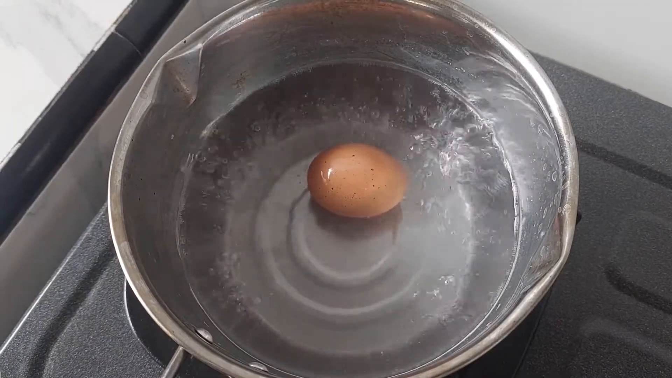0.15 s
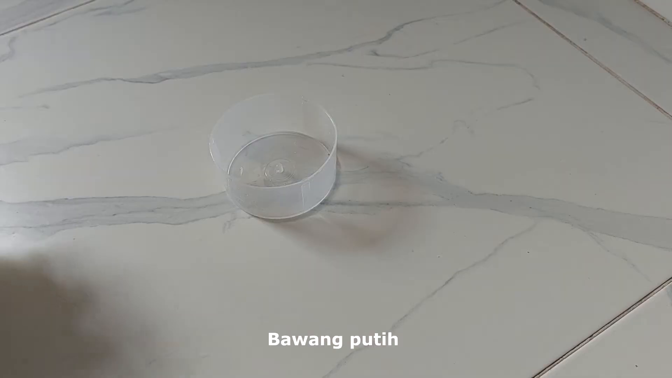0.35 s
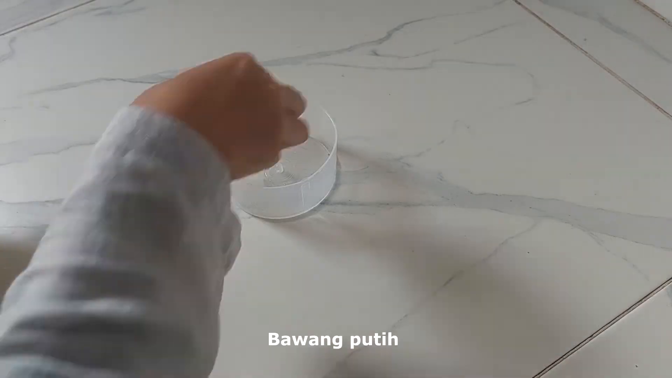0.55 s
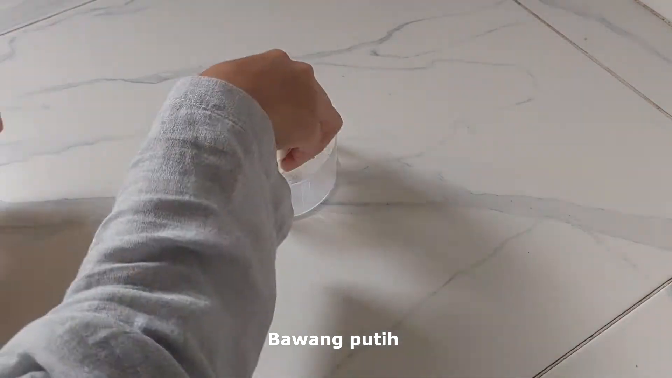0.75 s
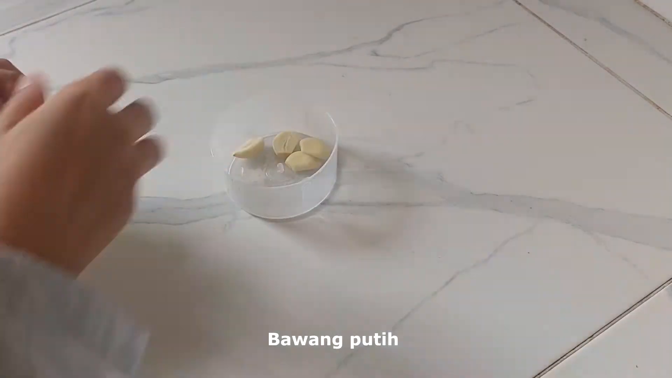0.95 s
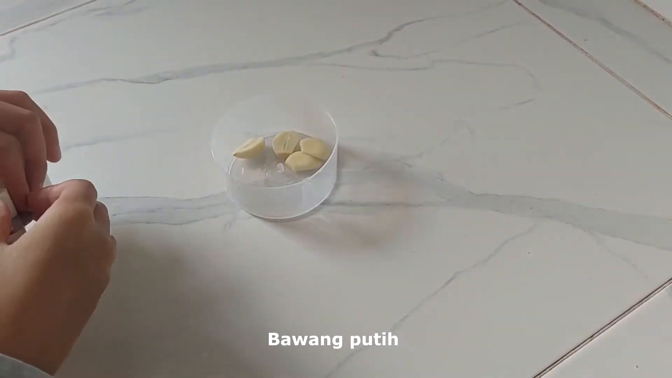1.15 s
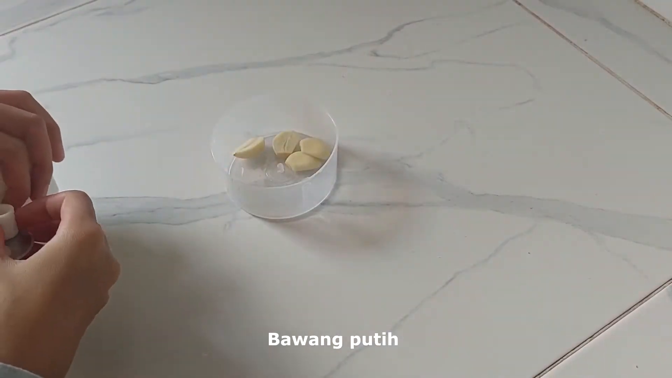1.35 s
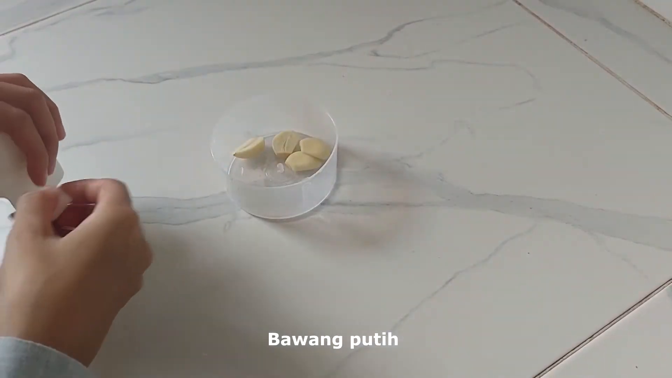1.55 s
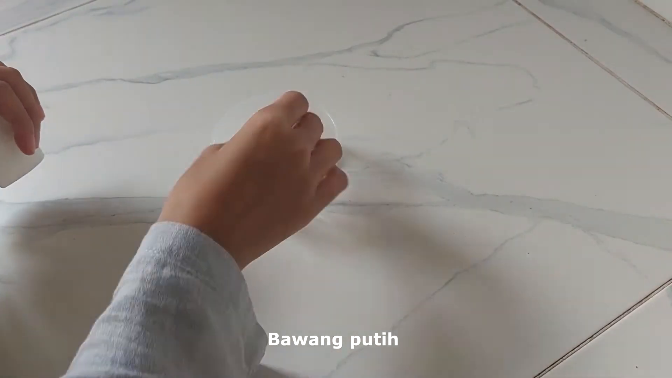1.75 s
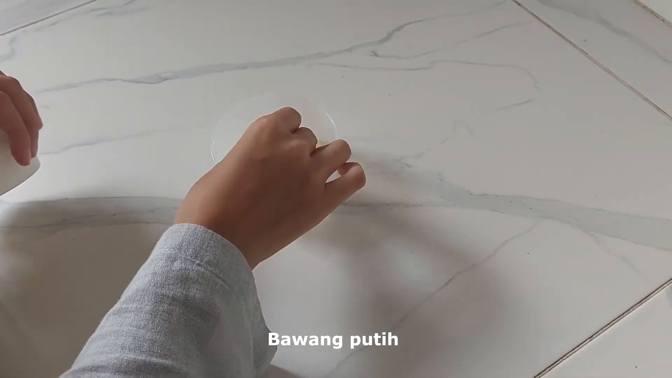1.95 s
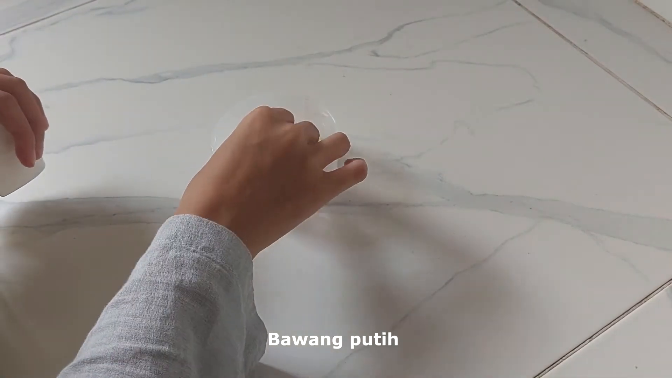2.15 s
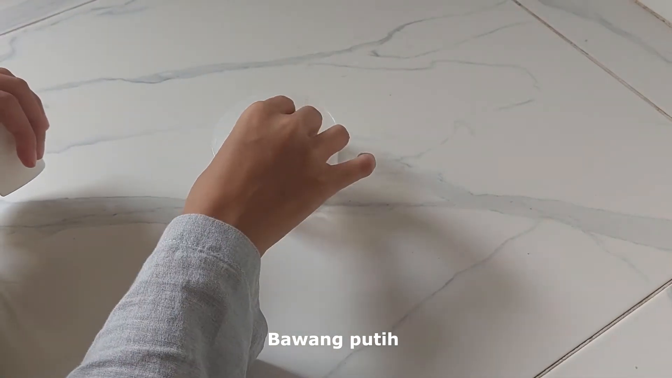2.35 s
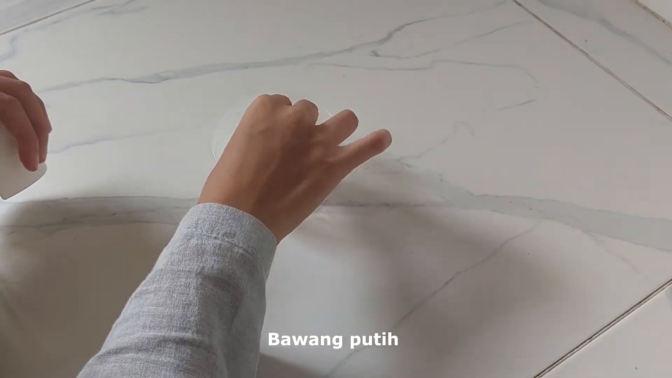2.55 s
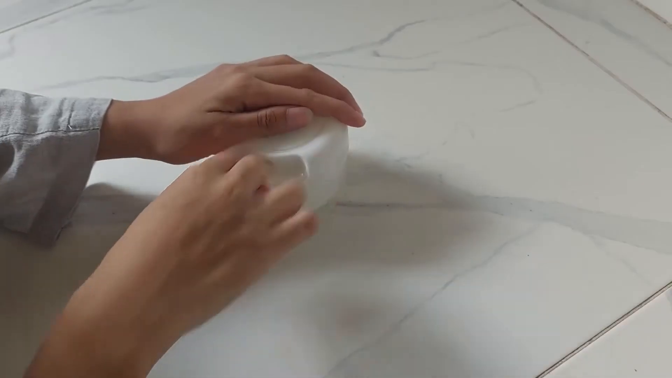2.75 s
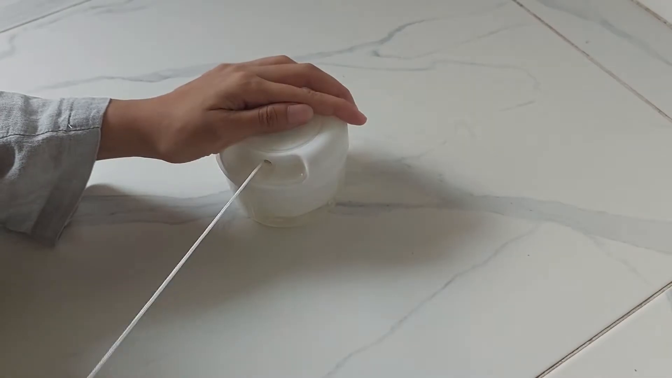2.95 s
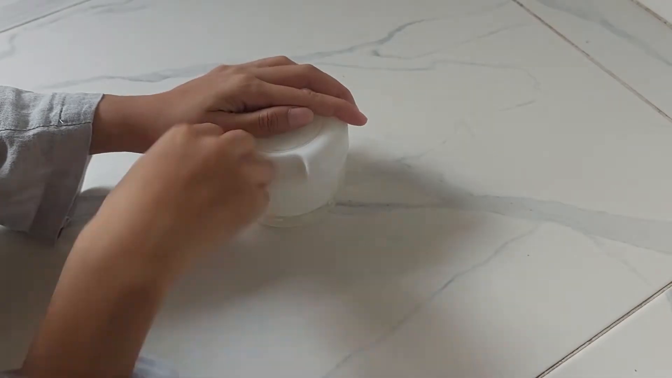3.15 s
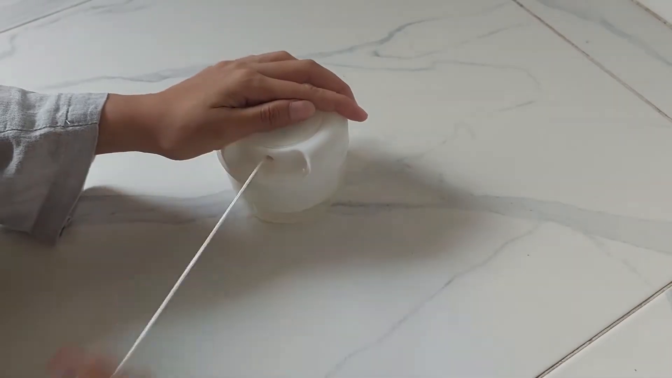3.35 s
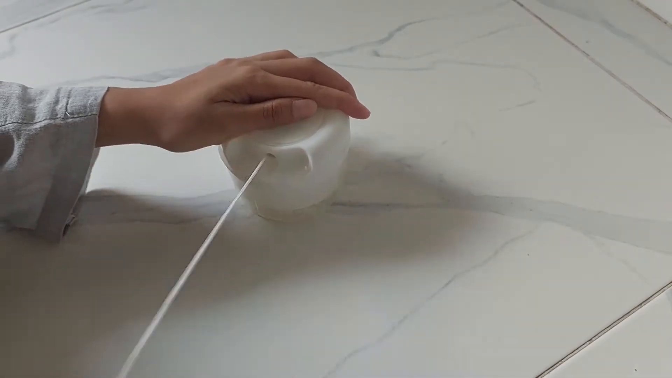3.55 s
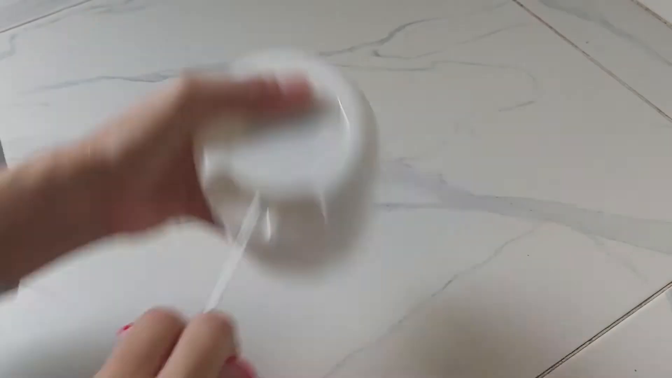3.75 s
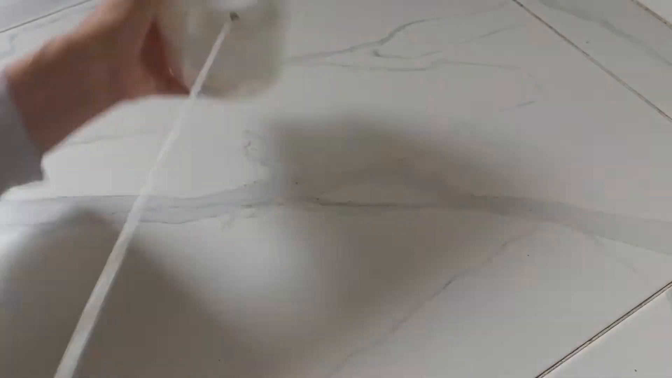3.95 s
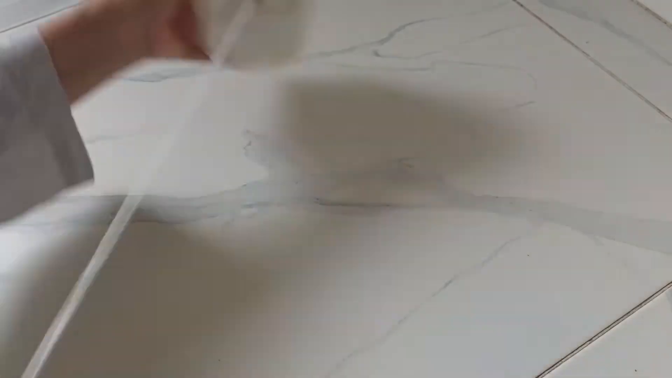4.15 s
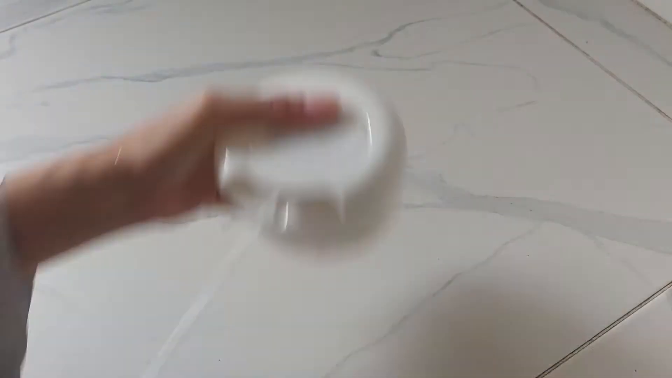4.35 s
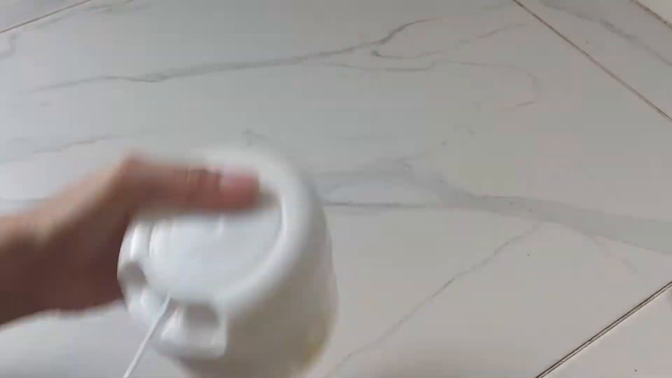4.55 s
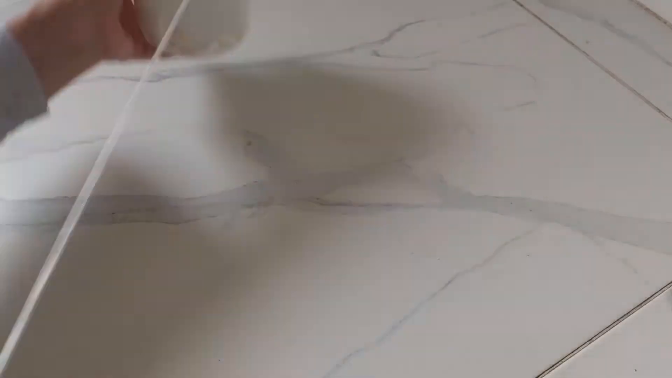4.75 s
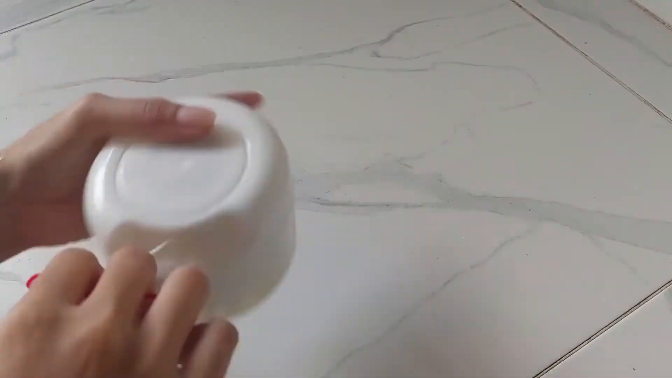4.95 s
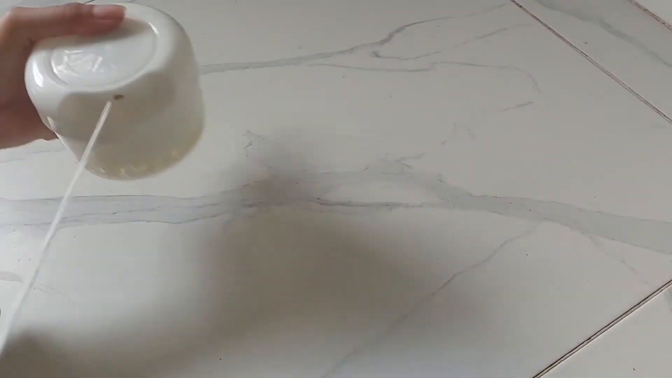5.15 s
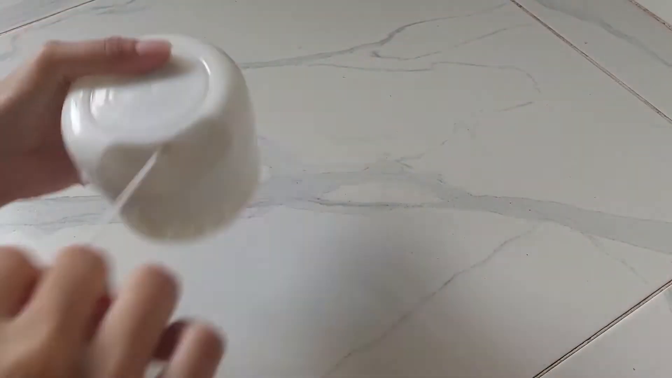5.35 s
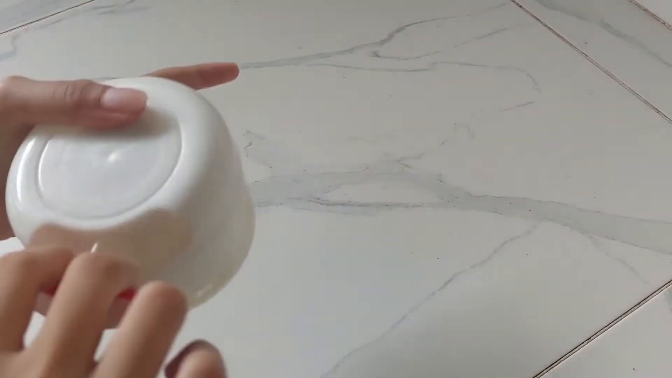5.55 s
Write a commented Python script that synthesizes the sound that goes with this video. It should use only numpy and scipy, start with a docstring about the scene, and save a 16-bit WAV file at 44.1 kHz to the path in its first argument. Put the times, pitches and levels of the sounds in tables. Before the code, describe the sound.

Short low simmer, light plastic taps, then close zipping cord pulls and whirring rewinds as a hand chopper crunches garlic, ending with hard knocks.

```python
"""Pull-cord chopper in a kitchen

A pot simmers for a moment; then cloves drop into a plastic cup on a tiled counter, close to two microphones.
A pull-cord chopper is worked in fast strokes: its drum booms, blades grind through the cloves,
the cord rasps over its reel, with knocks at some of the reversals. The listener jumps between five moments.
Random contacts and noise, shaped stroke by stroke, ring in each part's own body and in the room."""
import sys
import numpy as np
from scipy import signal
from scipy.fft import rfft, irfft
from scipy.io import wavfile

SR = 44100
rng = np.random.default_rng(int(sys.argv[2]) if len(sys.argv) > 2 else 0)


def digitize_waveform(pressure):
    """Quantize a signal to 16-bit integers and store it at the path in sys.argv[1].

    Rows of a 2-D input are taken as channels; values are limited to [-1, 1].
    """
    field = np.atleast_2d(pressure).T
    bounded = np.clip(field, -1, 1)
    quanta = np.round(bounded * 32767).astype(np.int16)
    wavfile.write(sys.argv[1], SR, quanta)


N = 246959


def from_db(db):
    """Level to gain."""
    return 10 ** (np.asarray(db) / 20)


def rms_one(x):
    """Scale to unit power."""
    return x / np.sqrt(np.mean(x ** 2) + 1e-20)


def in_time(rows):
    """Curve columns at every sample, silent before the first row and held after the last."""
    s, *columns = np.transpose(rows)
    return [np.interp(np.arange(N) / SR, s, c, left=-150, right=c[-1]) for c in columns]


def body(spectrum, modes=()):
    """Causal (minimum-phase) response of a colour with resonances on it; energy 1."""
    hz = np.maximum(np.fft.rfftfreq(8192, 1 / SR), 10)
    colour_hz, colour_db = np.transpose(spectrum)
    db = np.interp(np.log(hz), np.log(colour_hz), colour_db)
    for centre, width, lift_db in modes:
        db = db + lift_db / (1 + (2 * (hz - centre) / width) ** 2)
    # folding the cepstrum forward in time gives the minimum phase
    cepstrum = irfft(db * np.log(10) / 20)
    cepstrum[1:4096] *= 2
    cepstrum[4097:] = 0
    h = irfft(np.exp(rfft(cepstrum)))[:4096]
    return h / np.sqrt(np.sum(h ** 2))


def through(x, h):
    """Convolve along time."""
    return signal.oaconvolve(x, h if x.ndim == 1 else h[None], axes=-1)[..., :N]


def grains(per_s, spread_db, own=0):
    """Random contacts of uneven size at both microphones; a share reaches one only; rms 1."""
    heights = np.minimum(rng.exponential(1, (3, N)), 3.5)
    sizes = from_db(spread_db * heights) * rng.choice([-1, 1], (3, N))
    both, *each = sizes * (rng.random((3, N)) < per_s / SR)
    share = np.clip(own, 0, 1)
    return rms_one(np.sqrt(1 - share) * both + np.sqrt(share) * np.array(each))


ALIKE_HZ = 411   # below this the two microphones hear the same noise


def spread(size):
    """Noise at two microphones: alike in the bass, unrelated above."""
    low, high = (signal.butter(3, ALIKE_HZ, kind, fs=SR, output="sos") for kind in ("low", "high"))
    shared = signal.sosfilt(low, rng.standard_normal(size))
    return shared + signal.sosfilt(high, rng.standard_normal((2, size)))


def panned(pan_db):
    """Left and right gains."""
    return from_db([pan_db / 2, -pan_db / 2])


# five listening moments: (start time [s], cord whistle over the cord [dB], left minus right [dB],
# echo level [dB], wobble over the drum [dB], hollow share of the drum [0-1])
MOMENTS = [(0, 11, -11, 0, -28, 0.3), (0.279, -12, -1, -4, -20, 0), (2.647, -30, -2, 0, -10, 0.17),
           (3.712, 1.5, -2, -0.5, -3, 0.17), (4.882, 0.5, -1, -2, -8.5, 0.6)]
MOMENT_COLUMNS = ("start", "whistle_db", "pan_db", "echo_db", "wobble_db", "hollow")


def by_moment(column):
    """A column of the moments at every sample."""
    rows = np.array(MOMENTS)
    now = np.searchsorted(rows[:, 0], np.arange(N) / SR, side="right") - 1
    return rows[now, MOMENT_COLUMNS.index(column)]


EARLY_T60_S, ROOM_T60_S, ROOM_DB = 0.016, 0.18, -4.5
WALL_CUT_HZ, THIN_HZ = 7700, 390   # lowpass of the tail, highpass of all echoes


def echoes(early_db):
    """Close reflections off the counter and a duller diffuse tail, at both microphones; little bass."""
    t = np.arange(SR // 2) / SR
    early, late = (spread(size=len(t)) * from_db(-60 * t / t60) for t60 in (EARLY_T60_S, ROOM_T60_S))
    late = signal.lfilter(*signal.butter(1, WALL_CUT_HZ, fs=SR), late)
    both = (from_db(early_db) * rms_one(early) + from_db(ROOM_DB) * rms_one(late)) / np.sqrt(len(t))
    return signal.lfilter(*signal.butter(2, THIN_HZ, "high", fs=SR), both)


DIRECT_DB, RIGHT_LAG = -1, 6   # direct sound; it reaches the right this many samples later
PATTERN_S = 0.02   # time from one echo pattern to the next


def kitchen(near, early_db, count=7):
    """Direct sound plus echoes that crossfade among several random patterns; a jump in time ends the tail."""
    near = near * np.ones((2, 1))
    out = from_db(DIRECT_DB) * np.array([near[0], np.roll(near[1], RIGHT_LAG)])
    to_room = near * from_db(by_moment("echo_db"))
    turn = np.arange(N) / (PATTERN_S * SR)
    edges = [round(row[0] * SR) for row in MOMENTS] + [N]
    for k in range(count):
        away = np.abs((turn - k + count / 2) % count - count / 2)
        part = to_room * np.cos(np.pi / 2 * np.minimum(away, 1))
        h = echoes(early_db)
        for a, b in zip(edges, edges[1:]):
            out[:, a:b] += signal.oaconvolve(part[:, a:b], h, axes=1)[:, :b - a]
    # a short fade into each jump
    ends = np.array(edges[:-1] + [2 * N])
    to_jump = ends[np.searchsorted(edges, np.arange(N), side="right")] - np.arange(N)
    return out * np.minimum(1, to_jump / (0.0047 * SR))


AIR_DB = -65.5
# colour of the room air: (frequency [Hz], relative level [dB])
AIR = [(120, -42.5), (229, -23), (326, -27.5), (600, -32), (1100, -40.5), (2690, -43), (5500, -46),
       (6500, -39.5), (9000, -47.5), (16000, -46.5)]
# resonances on it: (frequency [Hz], width [Hz], lift [dB])
AIR_MODES = [(233.6, 19, 12.8), (1280, 110, 2.4), (7570, 270, 10.4)]


def room_air():
    """Steady coloured noise around both microphones."""
    return from_db(AIR_DB) * through(spread(size=N), body(AIR, AIR_MODES))


RUMBLE_PAN_DB = -6.5   # left minus right
# rumble before panning: (time [s], level [dB])
RUMBLE = [(0.0, -48.5), (0.49, -64), (0.52, -55), (1.07, -51.5), (1.44, -61), (2.04, -53.5), (2.08, -58),
          (2.47, -59), (2.66, -56.5), (2.81, -47.5), (3.25, -46.5), (3.34, -38.5), (3.76, -52.5),
          (4.86, -52.5), (4.93, -39.5), (5.6, -53.5)]
# its colour: (frequency [Hz], relative level [dB])
RUMBLE_COLOUR = [(15, -27.5), (30, -35.5), (70, -8.5), (130, -11), (190, -14), (500, -100.5)]
# resonance on it: (frequency [Hz], width [Hz], lift [dB])
RUMBLE_MODES = [(137, 15.6, 10.7)]


def low_rumble():
    """Low noise that swells and sinks, stronger on the right."""
    level_db, = in_time(RUMBLE)
    shaking = spread(size=N) + 0.35 * rng.standard_normal((2, N))   # partly its own at each microphone
    coloured = through(shaking, body(RUMBLE_COLOUR, RUMBLE_MODES))
    return from_db(level_db) * panned(np.full(1, RUMBLE_PAN_DB)) * coloured


# faint tones far off: (start time [s], end time [s], first frequency [Hz], last frequency [Hz],
# width [Hz], level before the fades [dB])
FAR = [(0.517, 0.616, 1300, 1300, 67, -73), (.76, 0.802, 2900, 2880, 130, -73),
       (.94, 1.075, 2420, 2230, 220, -71), (1.29, 1.447, 1550, 1360, 160, -70.5),
       (2.27, 2.48, 1190, 1220, 26, -77.5), (2.49, 2.633, 1290, 1170, 60, -64.5)]


def far_tones():
    """Narrow wavering whistles that glide, swell and fade: slow noise turned up to a moving pitch."""
    out = np.zeros((2, N))
    for start, end, from_hz, to_hz, width, db in FAR:
        a, b = int(start * SR), int(end * SR)
        turn = np.exp(2j * np.pi * np.cumsum(np.linspace(from_hz, to_hz, b - a)) / SR)
        slow = signal.lfilter(*signal.butter(2, width / 2, fs=SR), rng.standard_normal((2, 2, SR // 2)))
        re, im = slow[..., a - b:]   # the settled end of the filtered noise
        tone = rms_one(np.real((re + 1j * im) * turn))
        out[:, a:b] += from_db(db) * tone * signal.windows.tukey(b - a)
    return out


SIMMER_DB = -42
# colour of the simmering pot: (frequency [Hz], relative level [dB])
SIMMER = [(15, -42), (25, -16), (76, -7.5), (130, -27), (263, 2), (309, -13.5), (427, -10.5), (911, -19),
          (1560, -37), (2840, -39.5), (7710, -27), (16000, -38)]


def simmering_pot():
    """Noise roughened by random bubbles, gone by the first jump."""
    at_pot = np.clip((MOMENTS[1][0] * SR - np.arange(N)) / (0.011 * SR), 0, 1)
    bubbles = np.abs(through(grains(55, 28.0), np.hanning(500) / 14))
    bubbling = spread(size=N) * (1 + 0.07 * bubbles)
    return from_db(SIMMER_DB) * at_pot * through(rms_one(bubbling), body(SIMMER))


BOOM_HZ = 80
# the counter booms under a hand: (time [s], level [dB])
BOOM = [(2.51, -63.5), (2.54, -30), (2.572, -30), (2.622, -29.5), (2.647, -45)]


def counter():
    """One low tone of the slab, driven while the hand presses."""
    level_db, = in_time(list(BOOM) + [(2.65, -150)])
    return np.sqrt(2) * from_db(level_db) * np.sin(2 * np.pi * BOOM_HZ * np.arange(N) / SR)


PATTER_PER_S = 3000


def bursts(times, db, t60, snap=13.0):
    """A first snap, then a patter of small bounces that dies away."""
    out, t = np.zeros(N), np.arange(6000) / SR
    shape = (len(times), len(t))
    noise = rms_one(rng.standard_normal(shape) * (rng.random(shape) < PATTER_PER_S / SR))
    noise[:, 0] = snap
    for at, level_db, decay, row in zip(times, db, t60, noise):
        a = int(at * SR)
        out[a:a + len(t)] += from_db(level_db - 60 * t / max(decay, .003)) * row
    return out


# cloves and fingers on the cup: (time [s], base level [dB], wall level [dB], bright level [dB], rattle t60 [s])
TAPS = [(0.787, -60, -64, -75, 0.079), (.797, -45, -39, -59, 0.057), (.805, -24.5, -32, -50, 0.032),
        (.813, -28.5, -33, -55, 0.15), (.822, -34, -32, -44, 0.13), (.833, -28, -27, -28.5, 0.031),
        (.851, -29, -31, -34, 0.063), (.866, -37, -37, -42, 0.063), (.888, -35, -52, -52, 0.051),
        (1.202, -55.5, -60, -72, 0.25), (1.257, -48, -60, -80, 0.044), (1.554, -54.5, -47, -41, 0.14),
        (1.852, -66, -60, -63.5, 0.21), (1.925, -64, -49, -60, 0.054), (1.932, -49, -34, -51, 0.12),
        (1.977, -48, -47, -55, 0.3), (1.987, -48, -33.5, -55, 0.03), (2.006, -40.5, -47, -59, 0.13),
        (2.022, -51, -34, -52, 0.15), (2.029, -40, -36, -41, 0.048), (2.038, -51, -39, -42.5, 0.049),
        (2.05, -54, -39.5, -53, 0.061), (2.249, -69, -63, -77, 0.11), (2.468, -60, -47.5, -71, 0.18),
        (2.497, -66.5, -53.5, -72, 0.1), (2.636, -65, -65, -79, 0.048)]
# colours of base, wall and bright crack: (frequency [Hz], relative level [dB])
CUP_BASE = [(150, -32), (450, -6), (950, -9), (2500, -59)]
CUP_WALL = [(500, -42), (1200, -9), (1700, -3.5), (2400, -4), (5000, -59)]
CUP_BRIGHT = [(1200, -47.5), (2800, 2.5), (4500, 2), (7000, -13), (11000, -15), (16000, -29)]
# resonances on them: (frequency [Hz], width [Hz], lift [dB])
CUP_BASE_MODES = [(476, 79, 1.5), (744, 95, 10.6), (900, 250, 5.7)]
LOADED_BASE_MODES = [(630, 110, 6), (880, 120, 9)]
CUP_WALL_MODES = [(1414, 210, 19), (1650, 130, 11), (1910, 62, 3.2), (2150, 190, 4.3), (2920, 120, 9)]
CUP_BRIGHT_MODES = [(2770, 240, 4), (3400, 270, 1.7), (4300, 200, 2.4), (7370, 640, 9.9)]
LOADED_S = 1.5   # from here the blade stands in the cup


def cup():
    """Each contact rattles briefly and rings the cup's base, its wall and a bright crack."""
    s, base_db, wall_db, bright_db, t60 = np.transpose(TAPS)
    base = bursts(s, base_db, t60)
    loaded = np.arange(N) > LOADED_S * SR
    out = through(base * ~loaded, body(CUP_BASE, CUP_BASE_MODES))
    out += through(base * loaded, body(CUP_BASE, LOADED_BASE_MODES))
    out += through(bursts(s, wall_db, t60), body(CUP_WALL, CUP_WALL_MODES))
    return out + through(bursts(s, bright_db, t60), body(CUP_BRIGHT, CUP_BRIGHT_MODES))


RISE_BEND, FALL_BEND = 0.91, 0.88   # 1 = straight in dB
TAKE_UP_S = 0.0005   # a stroke fades in over this time


def strokes(rows, shape):
    """Power of drum, blades and cord: each stroke swells, holds and dies away."""
    t, power = np.arange(N) / SR, np.zeros((3, N))
    for start, rise, hold, fall, *peaks_db in rows:
        take_up = np.clip((t - start) / TAKE_UP_S, 0, 1)
        rising = np.clip(1 - (t - start) / rise, 0, 1) ** RISE_BEND
        for k, (start_db, kept, end_db) in enumerate(shape):
            held = hold * np.clip(kept, 0, 1)
            falling = (np.maximum(t - start - rise - held, 0) / (fall + hold - held)) ** FALL_BEND
            level_db = peaks_db[k] - start_db * rising - end_db * falling
            power[k] += take_up ** 2 * from_db(level_db) ** 2
    return power


BURST_RISE_S = 0.0045
# small bites and dying rattles: (time [s], t60 [s], drum level [dB], blades level [dB], cord level [dB])
BITES_AND_RATTLES = [(2.717, 0.82, -33.5, -32, -31.5), (3.245, 0.42, -42, -30, -30.5),
                     (3.82, 0.074, -38, -38, -31), (4.609, 0.057, -37, -30, -48),
                     (4.976, 0.15, -9.5, -11, -16), (5.049, 0.035, -39, -8, -41),
                     (5.4, 0.39, -29.5, -43, -64)]


def bites_and_rattles():
    """Power of brief bursts of drum, blades and cord, each dying away exponentially."""
    t, power = np.arange(N) / SR, np.zeros((3, N))
    for s, t60, *db in BITES_AND_RATTLES:
        rise = np.clip((t - s) / BURST_RISE_S, 0, 1)
        level_db = np.array(db)[:, None] - 60 * np.maximum(t - s, 0) / t60
        power += rise ** 2 * from_db(level_db) ** 2
    return power


# colours of the drum and of the air in the closed cup: (frequency [Hz], relative level [dB])
DRUM = [(60, -28.5), (130, -12), (250, -10), (420, -4), (620, -9.5), (1200, -42)]
HOLLOW = [(150, -32), (300, -7.5), (480, -5.5), (900, -25)]
# resonances on them: (frequency [Hz], width [Hz], lift [dB])
DRUM_MODES = [(229, 32, 7.6), (351.3, 39, 7.6), (444, 230, 3.7)]
HOLLOW_MODES = [(362, 72, 16), (453, 28, 11)]


def drum(shake, chops):
    """Random contacts and hard bites shake the drum, and the air in the closed cup takes its share."""
    closed = np.clip(by_moment("hollow"), 0, 1)
    in_drum = shake * np.sqrt(1 - closed) * rms_one(grains(1000, 4.1) + chops)
    in_hollow = shake * np.sqrt(closed) * rms_one(grains(1500, 3.3) + chops)
    return through(in_drum, body(DRUM, DRUM_MODES)) + through(in_hollow, body(HOLLOW, HOLLOW_MODES))


WOBBLE_LAG_S = 0.017
# colour of the wobbling cup: (frequency [Hz], relative level [dB])
WOBBLE = [(120, -25.5), (200, -12.5), (280, 0), (420, -35)]
# resonances on it: (frequency [Hz], width [Hz], lift [dB])
WOBBLE_MODES = [(218, 10, 20), (252, 28, 4.3)]


def wobble(pulling_power):
    """Trailing each pull, the spinning load makes the whole cup wobble."""
    late = np.roll(np.sqrt(pulling_power), int(WOBBLE_LAG_S * SR))
    sway = late * from_db(by_moment("wobble_db"))
    return through(sway * grains(600, 1.7), body(WOBBLE, WOBBLE_MODES))


FACING = 0.76   # share of the blades' and cord's contacts that reach one microphone only
# colour of the blades: (frequency [Hz], relative level [dB])
BLADES = [(290, -44.5), (550, -5.5), (1000, -3.5), (1500, -7.5), (3200, -13), (3700, -16), (7000, -20.5),
          (12500, -61)]
# resonances on it: (frequency [Hz], width [Hz], lift [dB])
BLADE_MODES = [(1190, 90, 0.8), (2540, 1140, 4.3)]


def blades(bite, chops):
    """Dense contacts and hard bites as the blades grind through the cloves."""
    return through(bite * rms_one(grains(7000, 4.4, FACING) + chops), body(BLADES, BLADE_MODES))


# colours of the cord's rasp and the reel's whistle: (frequency [Hz], relative level [dB])
CORD = [(1500, -16), (2500, 8), (5000, 0.5), (6000, -3), (8000, -2.5), (10000, 3), (12400, 3), (13500, 4),
        (15600, -2), (15900, -62)]
WHISTLE = [(5500, -29), (7200, -26), (9500, -14.5), (12000, -12), (13400, -23.5), (15600, -20.5),
           (15850, -43)]
# resonances on them: (frequency [Hz], width [Hz], lift [dB])
CORD_MODES = [(4200, 550, 5.4), (5160, 1100, 7.9), (7200, 1600, 13.3), (10600, 480, 4.1), (11620, 210, 7.3)]
WHISTLE_MODES = [(7200, 450, 22.6), (14480, 480, 16.7)]


def cord(rub, whistle, chops):
    """The braid rubs over its reel as dense uneven contacts; more even ones whistle on top."""
    rasp = through(rub * rms_one(grains(12000, 9.0, FACING) + chops), body(CORD, CORD_MODES))
    hiss = whistle * from_db(by_moment("whistle_db")) * grains(9000, 0.66, FACING)
    return rasp + through(hiss, body(WHISTLE, WHISTLE_MODES))


def blows(times, peak_db, h):
    """Unit-peak copies of a response, struck at the given times and levels."""
    clicks = np.zeros(N)
    clicks[(np.asarray(times) * SR).astype(int)] = from_db(peak_db)
    return through(clicks, h / np.abs(h).max())


CLICK_RISE_S = 0.00056
# sharp onsets and knocks of the chopper, before the room: (time [s], drum peak level [dB],
# click level [dB], click frequency [Hz], ringing share [0-1])
ONSETS_AND_KNOCKS = [(2.72, -19, -18, 6380, 0.9), (2.997, -10.5, -16, 6970, 0.28),
                     (3.251, -12.5, -16, 6900, 0.2), (3.524, -13.5, -16, 5000, 0.15),
                     (3.717, -39, -26, 7200, 0.6), (4.476, -30, -8, 7260, 0.03),
                     (4.607, -10.5, -18, 1480, 0.6), (4.953, -3, -16, 1630, 0.76),
                     (4.985, -1, -3, 2360, 0.34), (5.117, -7.5, -20, 1200, 0), (5.152, -10, -38, 900, 0.6),
                     (5.207, -10, -0.5, 3380, 0.7), (5.227, -2.5, -16, 2000, 0.1),
                     (5.399, -2, -13.5, 1650, 1), (5.559, -18.5, -37, 2310, 0.6)]


def onsets_and_knocks():
    """Each one sounds drum and hollow together, with a click: a short crack and more or less ring."""
    s, peak_db, click_db, click_hz, ringing = np.transpose(ONSETS_AND_KNOCKS)
    out = blows(s, peak_db, body(DRUM, DRUM_MODES) + 4 * body(HOLLOW, HOLLOW_MODES))
    t = np.arange(900) / SR
    cracks = np.diff(rng.standard_normal((len(s), len(t) + 1))) / 2
    for at, db, hz, share, crack in zip(s, click_db, click_hz, np.clip(ringing, 0, 1), cracks):
        ring = share * np.sin(2 * np.pi * hz * t)
        snap = (1 - share) * crack * from_db(-60 * t / 0.013)   # dies sooner than the ring
        tick = (ring + snap) * from_db(-60 * t / 0.022) * np.minimum(1, t / CLICK_RISE_S)
        a = int(at * SR)
        out[a:a + len(t)] += from_db(db) * tick
    return out


# the cord is pulled out against the load, then the spring winds it back in: (start time [s],
# rise [s], hold [s], fall [s], drum level [dB], blades level [dB], cord level [dB])
PULLS = [(2.768, 0.042, 0.13, 0.011, -23, -23, -32), (3.272, 0.056, 0.097, 0.053, -21, -20.5, -29),
         (3.79, 0.065, 0.04, 0.041, -28.5, -24.5, -28), (4.05, 0.045, 0.035, 0.079, -26, -25.5, -30),
         (4.305, 0.06, 0.036, 0.095, -27, -28.5, -31.5), (4.59, 0.048, 0.011, 0.11, -27, -26, -31),
         (4.99, 0.063, 0.08, 0.066, -23, -26, -24.5)]
REWINDS = [(2.993, 0.025, 0.082, 0.059, -32.5, -30.5, -21), (3.52, 0.035, 0.011, 0.27, -29, -29, -19.5),
           (3.714, 0.0012, 0.028, 0.026, -30.5, -26, -22.5), (3.94, 0.023, 0.024, 0.087, -28, -24, -23),
           (4.19, 0.024, 0.04, 0.073, -33, -26.5, -23.5), (4.47, 0.034, 0.033, 0.024, -27.5, -23.5, -22.5),
           (4.74, 0.046, 0.028, 0.047, -32.5, -25.5, -23), (4.882, 0.0017, 0.0058, 0.091, -16, -20, -18.5),
           (5.216, 0.014, 0.089, 0.11, -23, -20.5, -18)]
# stroke shapes, a row each for drum, blades, cord: (drop at the start [dB], share of the hold kept [0-1],
# drop after the fall [dB])
PULL_SHAPE = [(15, 0.92, 11.5), (14.1, 0.79, 14), (20.7, 0.45, 23)]
REWIND_SHAPE = [(12, 0.97, 17), (12, 0.82, 16.9), (14, 1, 25.1)]
# hard bites, heard at once in: (drum level [dB], blades level [dB], cord level [dB])
CHOP_DB = (-6, -5, -8)
CHOPS_PER_S, CHOP_SPREAD_DB = 350, 4.2
PULL_WHISTLE_DB = -27   # the reel whistles less under load


def chopper():
    """Strokes shake the drum, blades bite the cloves, the cord's braid rubs; each rings in its own body."""
    pulling = strokes(PULLS, PULL_SHAPE)
    winding = strokes(REWINDS, REWIND_SHAPE) + bites_and_rattles()
    shake, bite, rub = np.sqrt(pulling + winding)
    whistle = np.sqrt(from_db(PULL_WHISTLE_DB) ** 2 * pulling[2] + winding[2])
    chops = from_db(CHOP_DB)[:, None, None] * grains(CHOPS_PER_S, CHOP_SPREAD_DB)
    out = drum(shake, chops[0]) + wobble(pulling[0])
    out += blades(bite, chops[1]) + cord(rub, whistle, chops[2])
    return out + onsets_and_knocks()


CUP_EARLY_DB, CHOPPER_EARLY_DB = -1.5, -4.5   # reflections off the counter


def scene():
    """All sources in the kitchen, from the background to the chopper close by."""
    background = room_air() + low_rumble() + far_tones() + simmering_pot()
    near = counter() + kitchen(cup(), CUP_EARLY_DB) + kitchen(chopper(), CHOPPER_EARLY_DB)
    return background + near * panned(by_moment("pan_db"))


CUTOFF_HZ = 16400


def record(dry):
    """The top is cut and peaks clip at full scale."""
    top_cut = signal.cheby2(20, 60, CUTOFF_HZ, fs=SR, output="sos")
    return np.clip(signal.sosfilt(top_cut, dry), -1, 1)


dry = scene()
out = record(dry)
digitize_waveform(out)
```